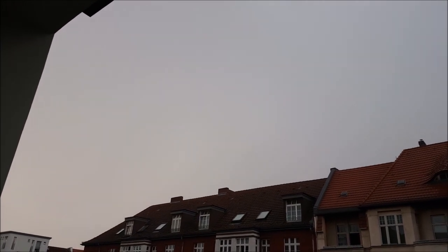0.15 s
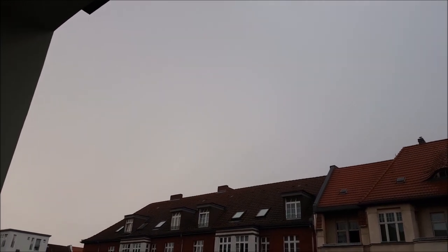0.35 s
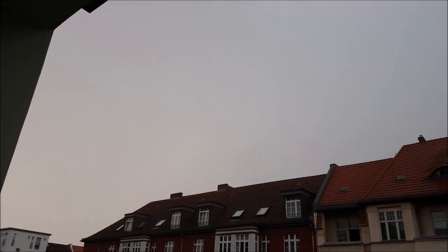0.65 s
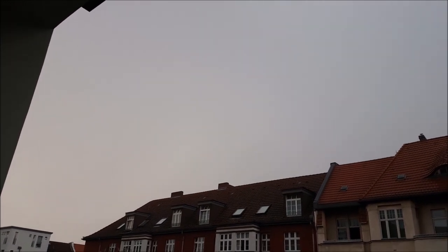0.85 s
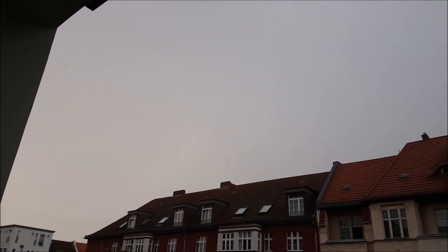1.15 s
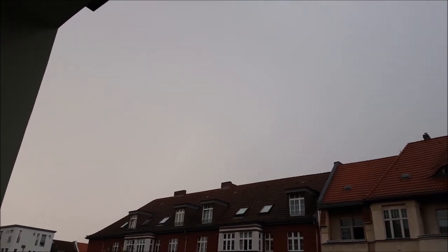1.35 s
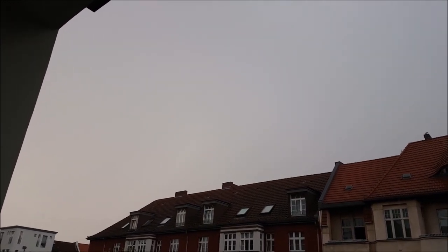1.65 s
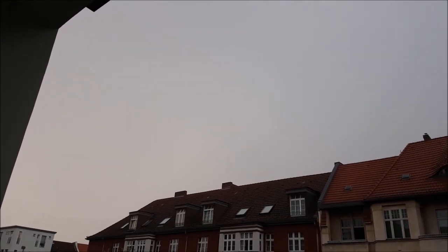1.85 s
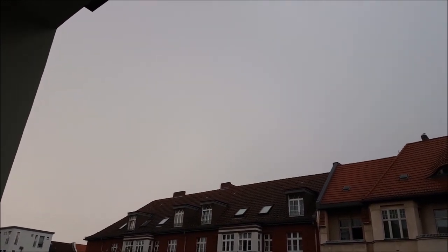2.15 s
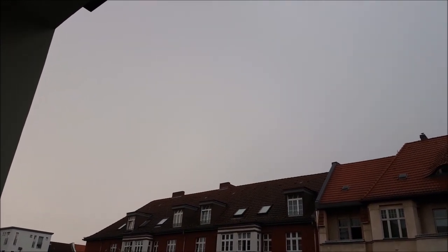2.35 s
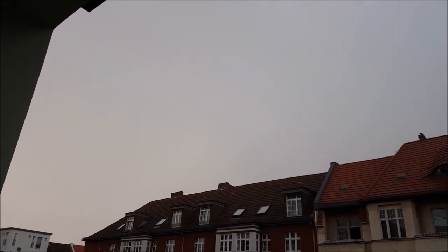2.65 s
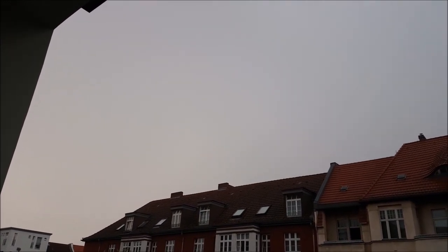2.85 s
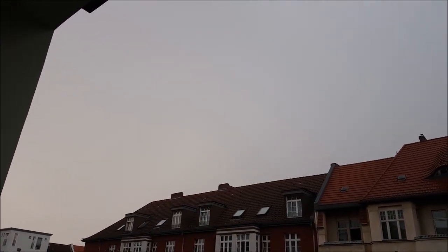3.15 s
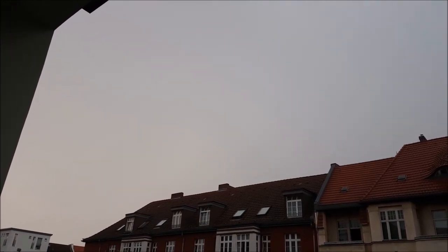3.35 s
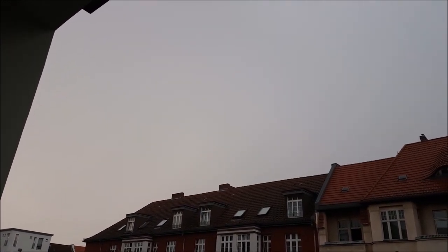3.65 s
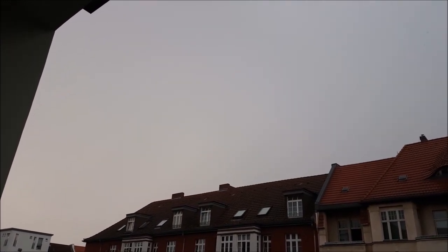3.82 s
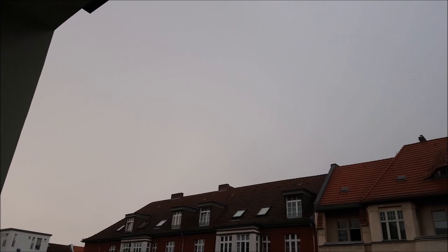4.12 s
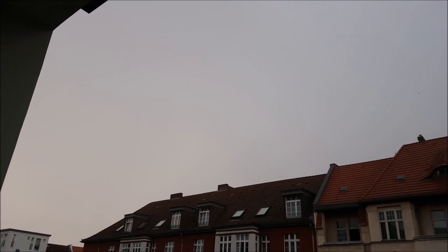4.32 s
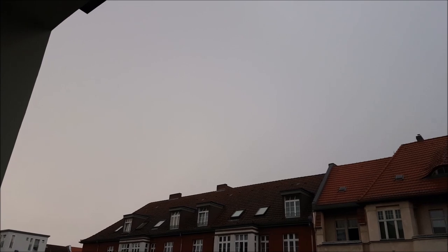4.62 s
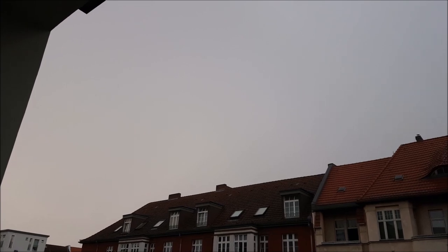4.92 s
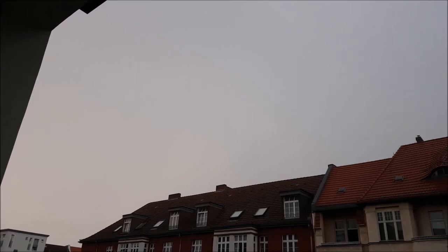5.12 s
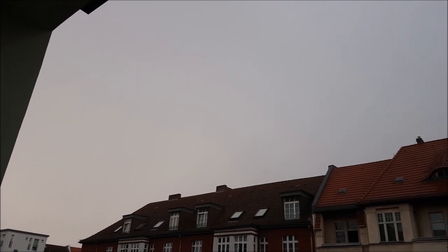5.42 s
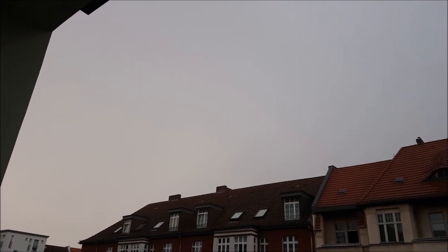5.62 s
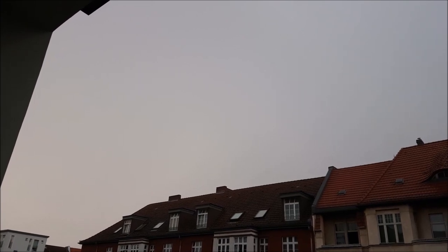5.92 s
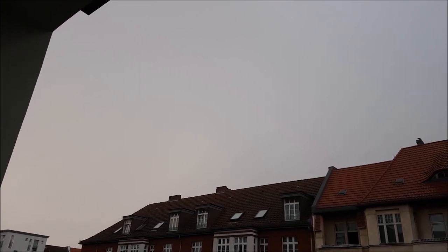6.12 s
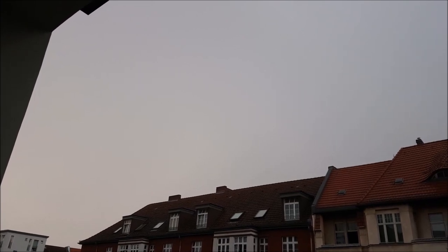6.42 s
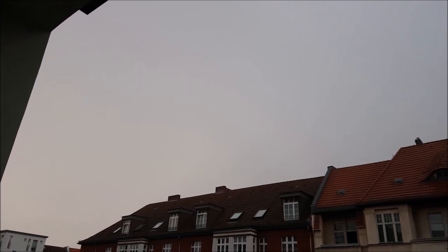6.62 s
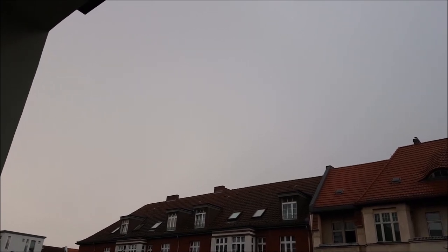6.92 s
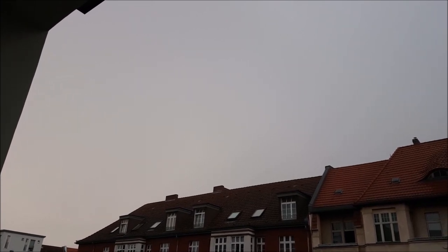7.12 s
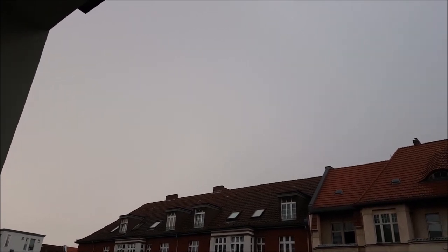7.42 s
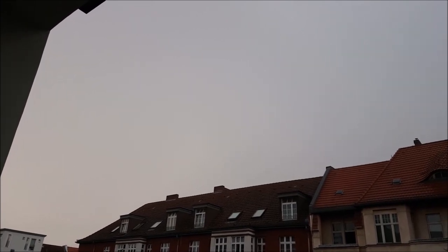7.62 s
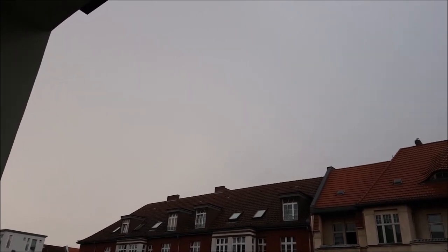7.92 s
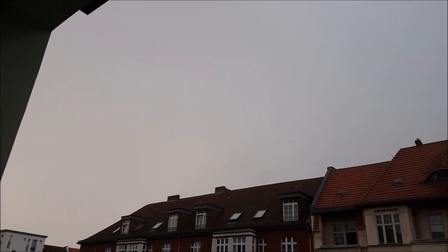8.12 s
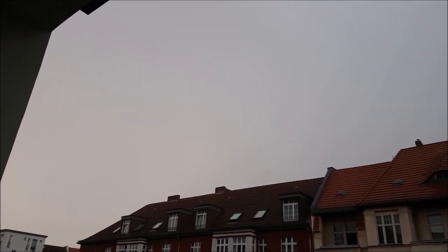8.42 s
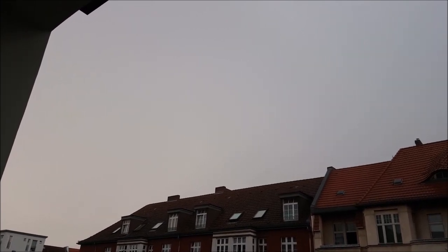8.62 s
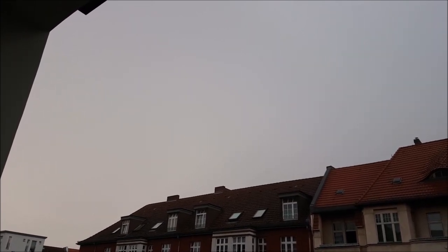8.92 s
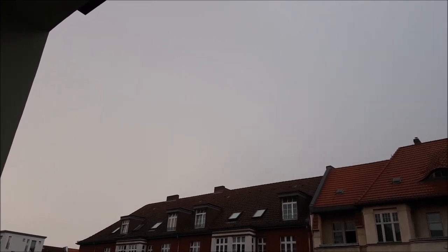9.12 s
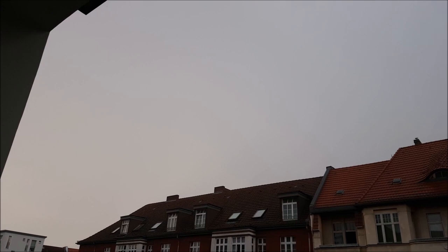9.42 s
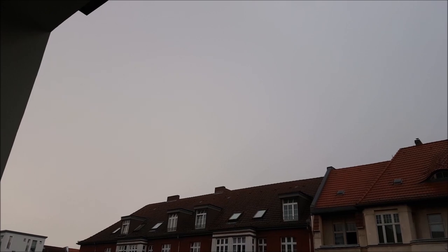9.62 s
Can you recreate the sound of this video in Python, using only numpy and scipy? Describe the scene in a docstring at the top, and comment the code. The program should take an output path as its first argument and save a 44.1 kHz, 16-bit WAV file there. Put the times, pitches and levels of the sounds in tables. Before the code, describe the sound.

A continuous storm rumble outdoors: quick overlapping thunder claps first, a broader surge near two seconds, a weaker stretch, then sharper crackle and big bass booms from about four seconds on. The later peals are duller, as if farther off, yet powerful. Soft steady rain patters throughout, gusting more in the second half, with tiny drop splashes near the stereo microphone; the loudest booms are slightly squashed.

```python
"""Thunder and rain over a street

Thunder rolls over tall houses, heard from an open window. Random shock fronts stand for the kinks of the
lightning channel: near kinks crack, far ones have lost their treble and boom; the window bay colours the bass.
Rain is noise with random impulses, swelling in gusts over a far downpour; single drops, short noise bursts,
tick close to the two microphone ports."""
import sys
import numpy as np
from scipy import signal
from scipy.fft import rfft, irfft, next_fast_len
from scipy.io import wavfile
from scipy.ndimage import uniform_filter1d, minimum_filter1d, map_coordinates

SR = 44100
rng = np.random.default_rng(int(sys.argv[2]) if len(sys.argv) > 2 else 0)


def persist_wave(psi):
    """Save psi, clipped to +-1, as 16-bit WAV."""
    counts = np.round(np.clip(psi, -1, 1) * 32767).astype(np.int16)
    wavfile.write(sys.argv[1], SR, np.atleast_2d(counts).T)


N = 430416


def amp(db):
    """Decibel law: amplitude gain of a level in dB."""
    return 10 ** (np.asarray(db) / 20)


def unit(x):
    """Normalisation: x at rms 1."""
    return x / np.sqrt(np.mean(x ** 2) + 1e-20)


def along(points, hz):
    """Logarithmic frequency scale: (f/Hz, value) points interpolated at hz."""
    f, values = np.transpose(points)
    return np.interp(np.log(hz + 1), np.log(f + 1), values)


def curves(rows):
    """Linear interpolation in time: one value per sample for each column after t/s."""
    times, *columns = np.transpose(rows)
    return [np.interp(np.arange(N) / SR, times, column) for column in columns]


def wobble(rate):
    """Band-limited fluctuation: a smooth random curve with rate knots a second."""
    knots = rng.standard_normal(int(N * rate / SR) + 4)
    return map_coordinates(knots, [np.arange(N) * rate / SR])


def filtered(x, response):
    """Linear filtering: the spectrum of x times a response of frequency."""
    m = next_fast_len(N + SR // 2)
    return irfft(rfft(x, m) * response(np.fft.rfftfreq(m, 1 / SR)), m)[..., :N]


def pulses(rate, spread_db):
    """Shot noise: two unrelated trains of impulses at random moments, with random sign and size."""
    chance = rng.random((2, N))
    sign = rng.standard_normal((2, N))
    size = rng.exponential(size=(2, N))
    return (chance < rate / SR) * sign * amp(spread_db * size)


def ports(pair, spectrum, alike):
    """Spatial coherence: two unrelated signals, coloured, then shared between the ports by frequency."""
    def response(hz):
        turn = np.arccos(np.clip(along(alike, hz), -1, 1)) / 2
        return amp(along(spectrum, hz)) * [np.cos(turn), np.sin(turn)]

    mid, side = filtered(pair, response)
    return unit(np.array([mid + side, mid - side]))


# rain hiss over time, partly gradual, partly sudden, before the final rain gain: (t/s, level/dB)
HISS_LEVEL = [(0, -51), (2.1, -52.5), (3, -49), (4.2, -47.5), (5.2, -46.5), (5.45, -49.5), (5.55, -45.5),
              (7.05, -46.5), (7.25, -48.5), (7.7, -48.5), (9.76, -48.5)]
# sheets of rain: (t/s of the peak, lift/dB)
GUSTS = [(2.42, 3.5), (4.42, 6.5), (5.08, 5.5), (5.56, 2.5), (6.08, 4.5), (6.7, 2.5), (7.03, 3), (7.539, 7),
         (7.891, 4.5), (8.12, 5), (8.71, 4.5), (9.2, 5.5), (9.55, 5.5)]
GUST_RISE_S, GUST_FALL_S = 0.019, 0.039


def shower():
    """Level modulation: the hiss level over time, and gusts that rise as a bell and fall exponentially, in dB."""
    t = np.arange(N) / SR
    lift_db = np.zeros(N)
    for s, db in GUSTS:
        shape = np.where(t < s, ((t - s) / GUST_RISE_S) ** 2, (t - s) / GUST_FALL_S)
        lift_db += db * np.exp(-shape)
    return curves(HISS_LEVEL)[0], lift_db


def flurries(rate, fade_s):
    """Exponential decay after random onsets: spray that lands at once and thins out."""
    landings = rng.random(N) < rate / SR
    return unit(signal.lfilter([1], [1, -np.exp(-1 / (fade_s * SR))], landings))


# relative spectrum of the far downpour: (f/Hz, level/dB per Hz)
STREET = [(300, -15), (700, 2.5), (1500, -3.5), (2400, -20.5), (3500, -23.5), (6000, -51.5), (12000, -86)]
# likeness of the ports in rain; negative is opposed: (f/Hz, correlation)
RAIN_ALIKE = [(500, 0.5), (1300, -0.18), (2400, 0.038), (15000, -0.18)]
FAR_BASE, FAR_LIFT = 0.28, 1  # share of the hiss level and of the gusts that the far downpour follows


def far_rain(base_db, lift_db):
    """Incoherent summation: countless distant drops merge into noise that swells with the near rain."""
    swell_db = FAR_BASE * (base_db - base_db.mean()) + FAR_LIFT * lift_db + 1.3 * wobble(8)
    return amp(-37.5 + swell_db) * ports(rng.standard_normal((2, N)), STREET, RAIN_ALIKE)


# relative spectrum of the near rain hiss: (f/Hz, level/dB per Hz)
ROOFS = [(1180, -22), (2000, 1.5), (3440, -9), (4530, -11), (5660, -12), (7020, -9), (8000, -14.5),
         (8850, -26.5), (12800, -20), (15600, -24)]
SPRAY_DB, SPRAY_GROWS = 2, 0.17  # mean fine spray against the hiss; extra swing per dB of hiss


def rain():
    """Random impacts: noise and impulses patter in flurries over a far downpour; near drops tick and splash."""
    base_db, lift_db = shower()
    hiss_db = base_db + lift_db
    spray_db = SPRAY_DB + SPRAY_GROWS * (hiss_db - hiss_db.mean())
    gusts = flurries(25, 0.016)
    gusts -= gusts.mean()
    patter = unit(rng.standard_normal((2, N)) + 2.2 * pulses(600, 1.5))
    spray = unit(rng.standard_normal((2, N)) + 2.5 * pulses(600, 1.5))
    patter *= amp(hiss_db + 1.3 * gusts)
    spray *= amp(hiss_db + spray_db + 1.6 * gusts + 1.2 * wobble(8))
    ticks, splashes = near_drops()
    patter += ticks
    spray += splashes
    # the finest spray owns the top octave
    near = filtered(patter, lambda hz: hz < 8800) + filtered(spray, lambda hz: hz >= 8800)
    # colouring resets the level to rms 1; the rms of the patter restores it
    near = amp(5.5) * ports(near, ROOFS, RAIN_ALIKE) * np.sqrt(np.mean(patter ** 2))
    return far_rain(base_db, lift_db) + near


# near drops, relative levels before the rain colouring: (t/s, tick level/dB, fine spray level/dB)
DROPS = [(3.9293, -37.5, -32), (4.1455, -28, -25.5), (5.5209, -45, -27), (5.8504, -32.5, -38),
         (5.972, -27.5, -36), (6.259, -29.5, -36), (6.6982, -35, -40), (6.809, -29.5, -21.5),
         (7.287, -33.5, -28.5), (7.4436, -32, -28), (9.1701, -55, -32)]
TICK_HZ = 3500  # ticks are at half amplitude here and fall steeply below


def near_drops():
    """Impulsive noise: each drop is a burst with a fast and a slow decay, as a tick and as fine spray."""
    t = np.arange(SR // 5) / SR
    # 60 dB of decay in 0.04 s and in 0.25 s
    splash = 0.25 * amp(-60 * t / 0.04) + 0.21 * amp(-60 * t / 0.25)
    ticks, spray = np.zeros((2, N)), np.zeros((2, N))
    for s, *levels_db in DROPS:
        for layer, db in zip((ticks, spray), levels_db):
            span = layer[:, round(s * SR):][:, :len(t)]
            burst = amp(db) * splash * rng.standard_normal((2, len(t)))
            span += burst[:, :span.shape[1]]
    return filtered(ticks, lambda hz: 1 / (1 + (TICK_HZ / (hz + 1)) ** 4)), spray


def scattered(pair, patchy_db):
    """Scattering: clouds and facades send back shifting patches of the spectrum, stronger or weaker."""
    z = signal.stft(pair, nperseg=2048)[2]
    field = rng.standard_normal(z.shape[1:])
    field = uniform_filter1d(field, size=3, axis=0)  # smooth over frequency
    field = uniform_filter1d(field, size=9, axis=1)  # smooth over time
    return signal.istft(z * amp(patchy_db * unit(field)), nperseg=2048)[1][:, :N]


# likeness of the ports in thunder: (f/Hz, correlation)
THUNDER_ALIKE = [(60, 0.95), (180, 0.93), (350, 0.61), (650, 0.66), (1300, 0.29), (2400, 0.1)]


def shocks(rate, colour, patchy_db):
    """Superposed shock fronts: random impulses of one colour, levelled by their rms over a tenth of a second."""
    sound = ports(scattered(pulses(rate, 0.89), patchy_db), colour, THUNDER_ALIKE)
    power = uniform_filter1d(np.mean(sound ** 2, axis=0), SR // 10)
    return sound / np.sqrt(np.abs(power))


# one row a clap, roll levels before clumping, bay and brief gain:
# (arrival t/s, build-up/s, peak level/dB, fade/dB per s, distance/km, boom against roll/dB)
CLAPS = [(0.196, 0.17, -21.5, 35, 0.76, -4), (.42, 0.016, -18.5, 25, 0.65, -7.5),
         (0.68, 0.02, -24, 60, 1.8, 5), (0.885, 0.009, -19, 38.5, 1.36, -6),
         (1.281, 0.005, -27, 144, 1.5, -7), (1.338, 0.01, -27, 14.5, 1.07, -8),
         (1.841, .25, -15.5, 33.5, 1.25, -10), (2.33, 0.068, -27.5, 9, 0.75, -0.5),
         (2.84, 0.017, -27, 67, 0.78, -15), (3.07, 0.01, -24.5, 22.5, 0.94, -6),
         (3.634, 0.14, -22.5, 33, 0.063, -1), (3.96, 0.13, -23.5, 20.5, 0.49, -0.5),
         (4.169, 0.031, -13.5, 42, 0.95, -0.5), (4.47, 0.15, -23, 53, 0.9, -5.5),
         (4.62, 0.04, -32, 82, 0.3, 15), (4.698, 0.15, -12.5, 55, 2.64, 6), (4.98, 0.19, -18, 261, 7.6, -9),
         (5.272, 0.092, -25.5, 31, 3.8, 2), (5.397, 0.06, -19.5, 93, 2.3, -3),
         (5.5, 0.093, -17.5, 30.5, 2.73, -0.5), (6.0, 0.068, -25.5, 33, 2.8, 1.5),
         (6.12, 0.036, -24, 30, 1.84, 3.5), (6.191, 0.12, -15.5, 42, 3.1, -5),
         (6.42, 0.24, -17.5, 35, 3.06, -3), (6.8, 0.37, -17, 44, 2.77, 0),
         (7.3, 0.047, -14.5, 46, 2.86, -6), (7.502, 0.25, -13.5, 36, 3.33, -2.5),
         (7.82, 0.15, -15.5, 33, 3.7, -4), (8.143, 0.21, -16.5, 5, 2.6, 0.5),
         (9.0, 0.075, -12.5, 58, 2.76, 1), (9.47, 0.14, -23, 5, 5.2, 2)]
FRONT_S, BUILD_DB = 0.0026, 5  # a clap sets in this fast, then grows this much to its peak
CRACK_DB, CRACK_LOSS_DB_PER_KM = 7, 7  # crack against the roll, and what the air takes from it
MURMUR_DB = (-44, -55, -40.5)  # far storm under the claps: boom, roll, crack


def claps():
    """Energy addition and air absorption: gains of boom, roll and crack as claps set in, build and fade."""
    step = 64  # samples between envelope points
    t = np.arange(0, N + step, step) / SR
    s, build, peak_db, fade, km, boom_db = np.transpose(CLAPS)[..., None]
    age = t - s
    shape_db = np.where(age < build, BUILD_DB * (age / build - 1), fade * (build - age))
    front = np.clip(age / FRONT_S, 0, 1) ** 2
    energy = front * amp(2 * (peak_db + np.minimum(shape_db, 0)))
    shares_db = boom_db, 0 * km, CRACK_DB - CRACK_LOSS_DB_PER_KM * km
    gains = []
    for db, low_db in zip(shares_db, MURMUR_DB):
        total = (energy * amp(2 * db)).sum(axis=0) + amp(2 * low_db)
        gains.append(np.interp(np.arange(N) / SR, t, np.sqrt(total)))
    return gains


# relative spectrum of the boom: (f/Hz, level/dB per Hz)
BOOM = [(20, -28), (45, -20), (62, -1), (90, -2.5), (125, 11), (170, -0.5), (300, -14.5), (2000, -120)]


def boom(clumps):
    """Low-pass propagation: fronts left with bass only, little affected by the clumps."""
    return amp(0.25 * clumps) * shocks(900, BOOM, 1.74)


# relative spectrum of the roll: (f/Hz, level/dB per Hz)
ROLL = [(80, -22.5), (130, -4), (160, -1.5), (250, -3.5), (320, -15.5), (600, -25.5), (1500, -40.5),
        (4000, -95)]


def roll(clumps):
    """Spread of arrival times: dense fronts in the low middle, surging with the clumps."""
    return amp(1.0 * clumps) * shocks(1500, ROLL, 2.8)


# relative spectrum of the crack: (f/Hz, level/dB per Hz)
CRACK = [(120, -27), (250, -10.5), (350, -1), (500, -6.5), (750, -7.5), (1100, -15), (1700, -24.5),
         (2800, -38.5), (5000, -76), (12000, -130)]
# lift or cut of the treble within the crack: (t/s, lift/dB)
TREBLE_TILT = [(0, 7), (.6, 1), (1.5, 3), (3.7, -6.5), (4.2, -7.5), (4.6, 2.5), (5.2, 3), (9.76, -10)]


def crack(clumps):
    """Spectral tilt: dense sharp fronts whose high-passed share is raised or lowered over time."""
    fronts = shocks(5000, CRACK, 2.8)
    treble = filtered(fronts, lambda hz: 1 / (1 + (900 / (hz + 1)) ** 4))
    tilt_db = curves(TREBLE_TILT)[0]
    return amp(0.34 * clumps + 1.68 * wobble(45)) * (fronts + (amp(tilt_db) - 1) * treble)


# low thumps and drawn-out drones, from deep bass to the middle range, before bay and brief gain:
# (t/s, peak level/dB, f/Hz, cycles to the peak)
THUMPS = [(0.185, -21, 86, 1.6), (0.902, -27, 69.3, 1.7), (2.041, -20, 65.4, 1.4), (2.25, -17.5, 123.6, 11),
          (4.713, -14, 82, 1.2), (4.8, -13, 79, 2.2), (4.779, -24, 493.3, 32), (4.88, -14, 152.4, 22),
          (5.361, -18, 235, 35), (5.421, -12.5, 76, 1.7), (6.09, -20, 120.2, 17), (6.119, -29, 491, 48),
          (6.249, -11.5, 64.6, 1.4), (8.14, -17.5, 61.7, 2.3), (8.159, -19.5, 149.4, 28),
          (8.271, -16.5, 57.5, 1.3), (8.98, -25, 410, 40), (9.139, -14, 123.3, 15)]


def thumps():
    """Transient oscillation: swings of air that swell and die, with unsteady phase, fed alike to both ports."""
    t = np.arange(N) / SR
    out, sway = np.zeros(N), 0.5 * wobble(14)
    for s, db, hz, rise in THUMPS:
        cycles = np.maximum(t - s, 0) * hz
        u = cycles / rise
        out += amp(db) * u ** 2 * np.exp(1 - u ** 2) * np.sin(2 * np.pi * cycles + sway)
    return out


# brief changes of recording gain, mostly dips, applied here to the thunder only:
# (t/s, change/dB, half length/s)
BRIEF_GAIN = [(0.873, -3, .015), (3.947, -3, 0.012), (4.582, -5.5, .015), (5.26, -0.5, 0.18),
              (7.269, -2.5, 0.034), (9.44, 0.5, 0.036)]


def brief_gain():
    """Amplitude modulation: brief bell-shaped changes of recording gain, mostly dips."""
    t = np.arange(N) / SR
    return amp(sum(db * np.exp(-((t - s) / half) ** 2) for s, db, half in BRIEF_GAIN))


# window bay; air modes lift, wall echoes cancel: (f/Hz, width/Hz, lift/dB)
BAY = [(62, 7.9, 9.5), (81, 10, 4), (122.7, 12, 1), (143.4, 28, -9), (154.2, 13, 9), (199.6, 8.8, 2),
       (219.8, 5.4, 5), (336.8, 6.5, 5.5), (425.4, 83, 4), (486, 20, 6), (684, 55, 2.5)]


def bay(hz):
    """Resonance: the recess rings on after the sound that excites it, a causal lift or cut for each row."""
    return amp(sum(lift_db / (1 + 2j * (hz - centre) / width) for centre, width, lift_db in BAY))


# phase between the ports in thunder: (f/Hz, left lead/rad)
LEAD = [(600, 0), (1250, 3.0)]


def thunder():
    """Superposition along a long source: shocks from the kinks, duller with distance, pass through the bay."""
    boom_gain, roll_gain, crack_gain = claps()
    clumps = wobble(22)  # kinks at like distance arrive in bunches
    fronts = boom_gain * boom(clumps) + roll_gain * roll(clumps) + crack_gain * crack(clumps)

    def askew(hz):
        # the bay walls turn the treble between the ports
        return bay(hz) * np.exp(1j * along(LEAD, hz) * [[.5], [-.5]])

    return brief_gain() * filtered(fronts + thumps(), askew)


def scene():
    """Linear superposition: thunder above the rain."""
    return rain() + thunder()


# balance of the ports: (f/Hz, left minus right/dB)
LEAN = [(60, 2), (180, -0.5), (550, -1.0), (1650, -2), (4970, -3), (7000, -8.5), (9000, 2), (15000, -2.5)]
TOP_HZ = 15780  # nothing passes above


def record(dry):
    """Dynamic compression: the ports differ in colour, loud booms duck everything, and the band ends sharply."""
    leaning = filtered(dry, lambda hz: amp(along(LEAN, hz) * [[.5], [-.5]]))
    peak = np.abs(leaning).max(axis=0) + 1e-9
    needed = np.minimum(1, .75 / peak) ** .75  # three quarters of the excess dB above 0.75
    hold = SR // 40
    gain = uniform_filter1d(minimum_filter1d(needed, hold), hold)
    return filtered(gain * leaning, lambda hz: hz < TOP_HZ)


dry = scene()
out = record(dry)
persist_wave(out)
```